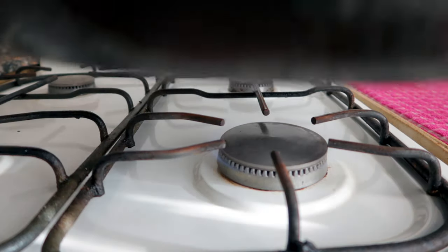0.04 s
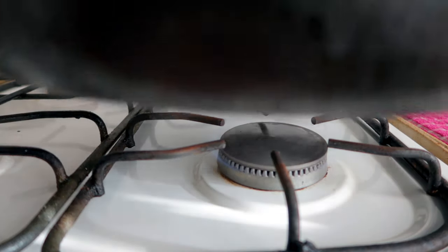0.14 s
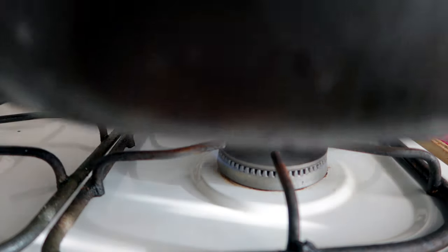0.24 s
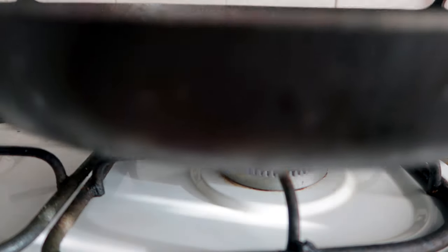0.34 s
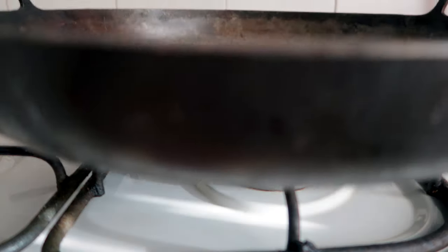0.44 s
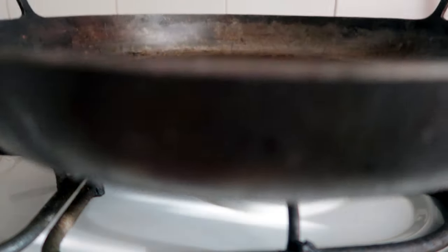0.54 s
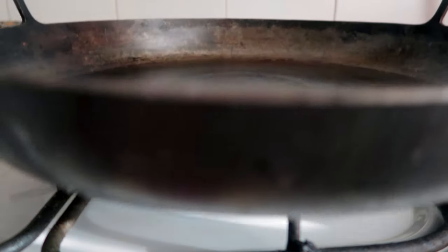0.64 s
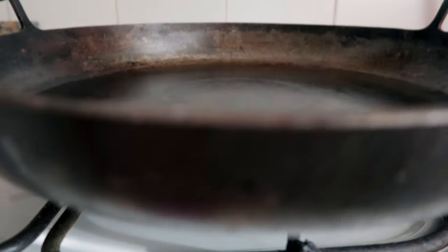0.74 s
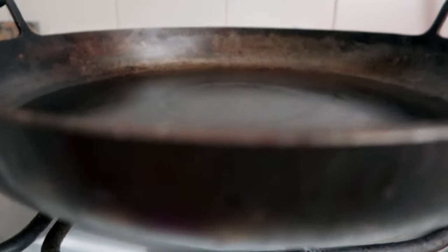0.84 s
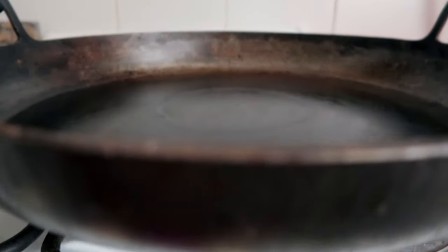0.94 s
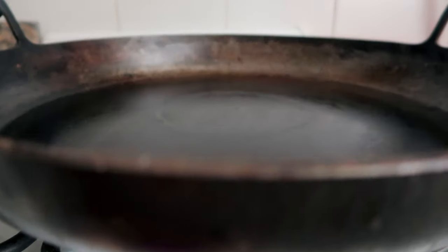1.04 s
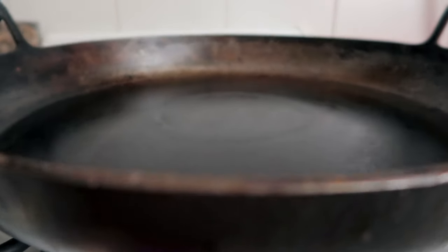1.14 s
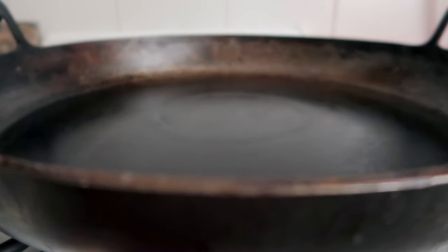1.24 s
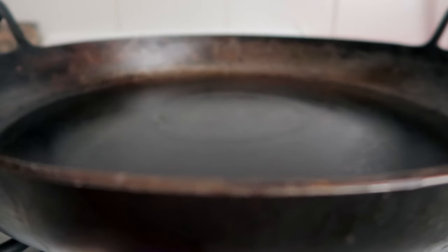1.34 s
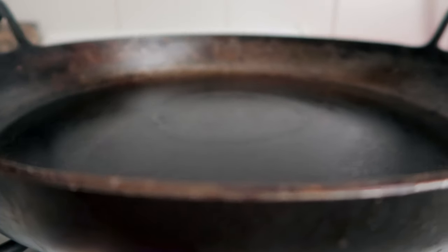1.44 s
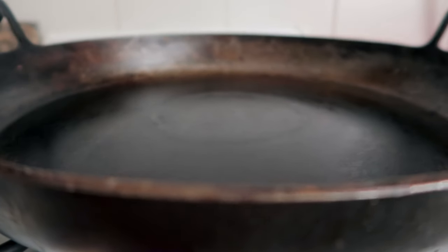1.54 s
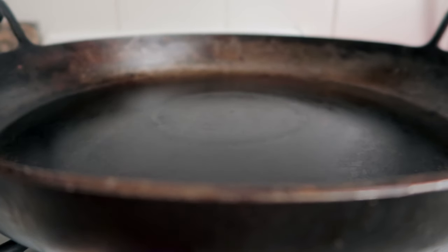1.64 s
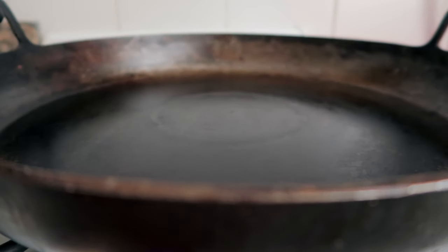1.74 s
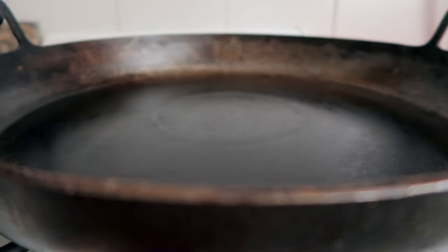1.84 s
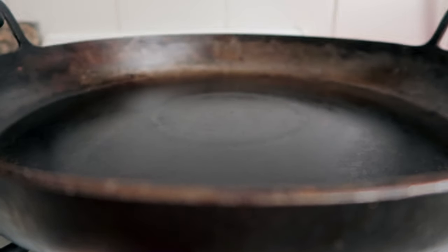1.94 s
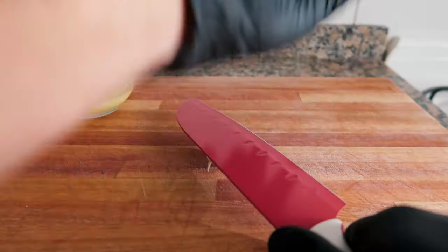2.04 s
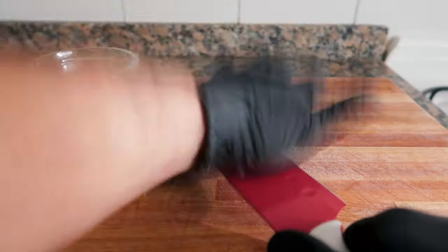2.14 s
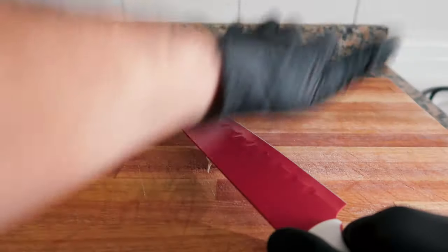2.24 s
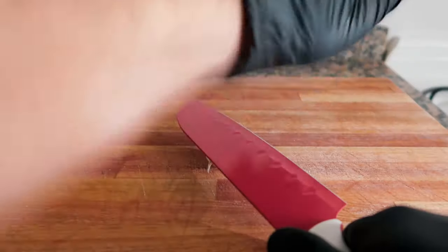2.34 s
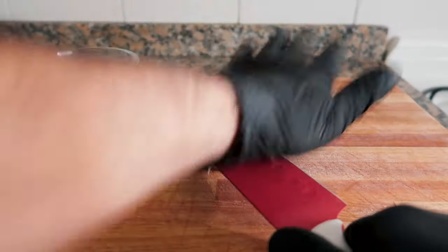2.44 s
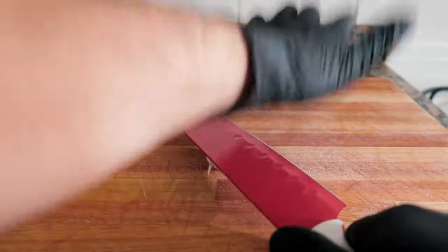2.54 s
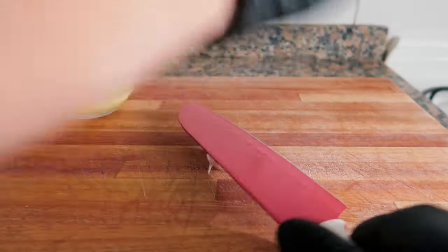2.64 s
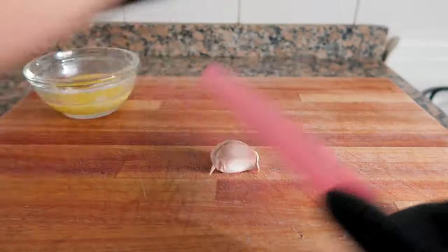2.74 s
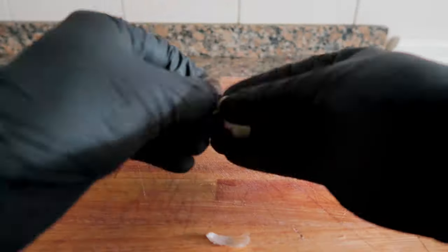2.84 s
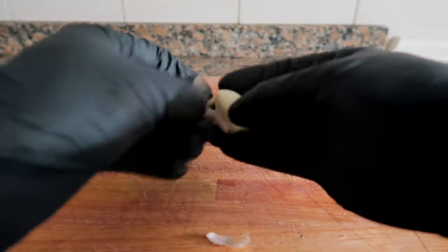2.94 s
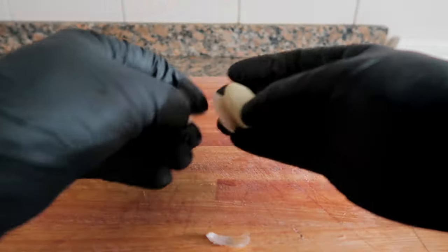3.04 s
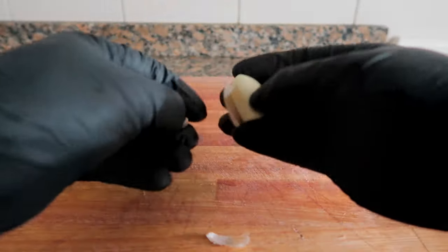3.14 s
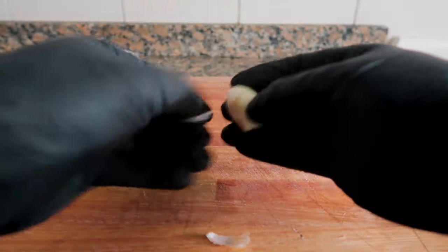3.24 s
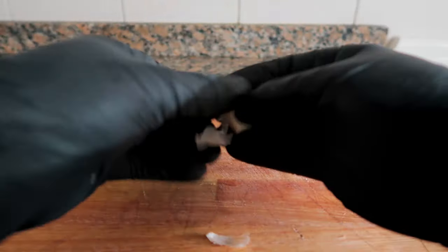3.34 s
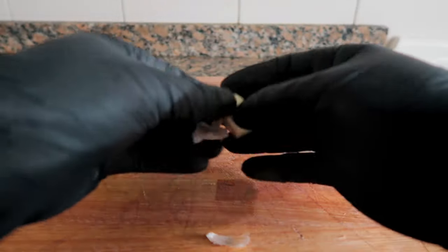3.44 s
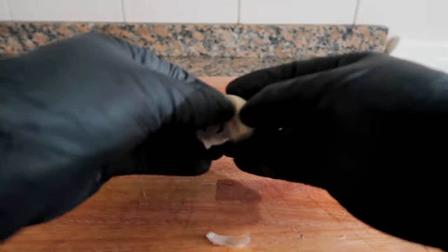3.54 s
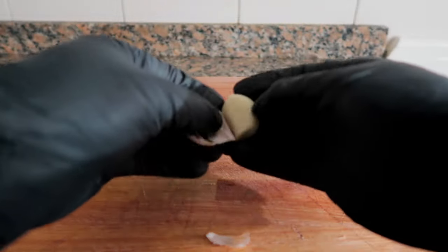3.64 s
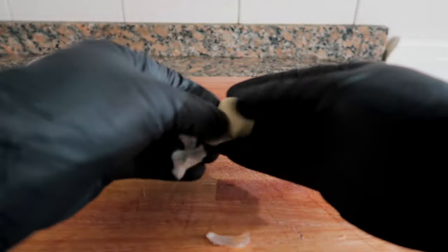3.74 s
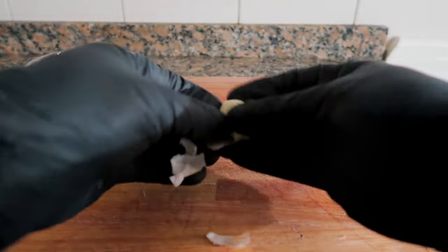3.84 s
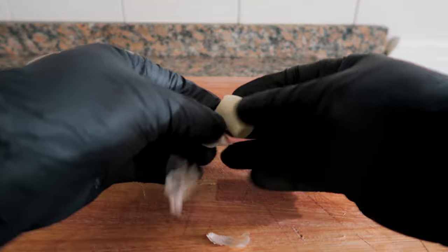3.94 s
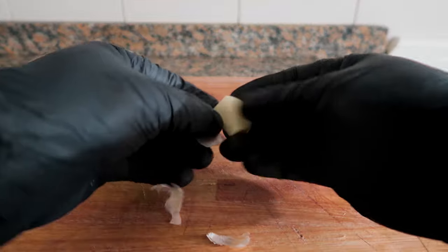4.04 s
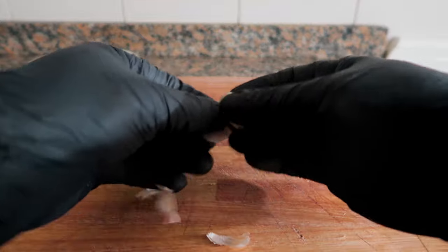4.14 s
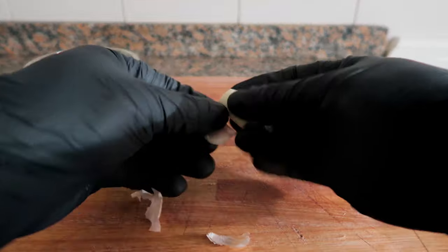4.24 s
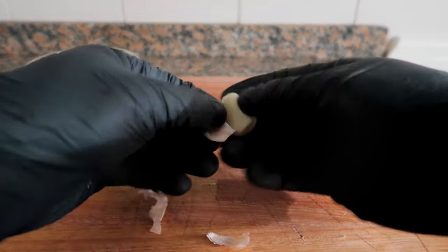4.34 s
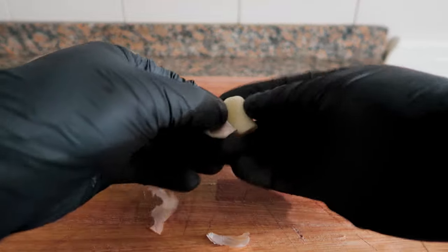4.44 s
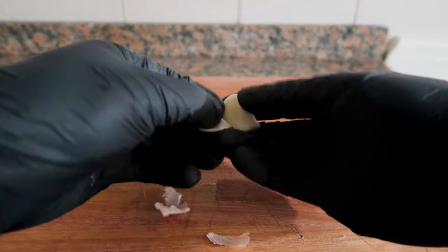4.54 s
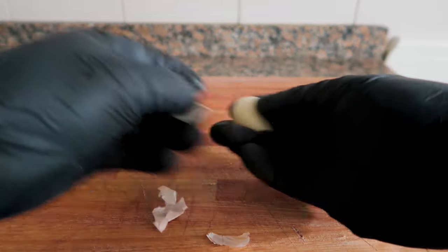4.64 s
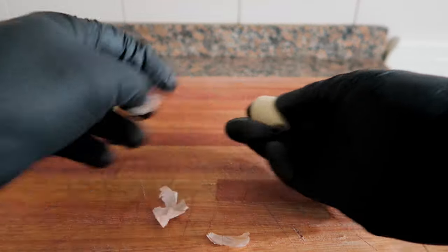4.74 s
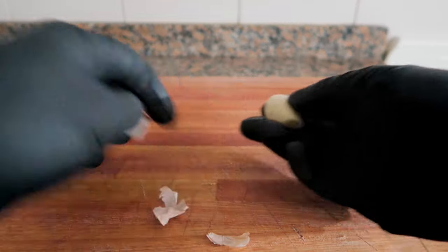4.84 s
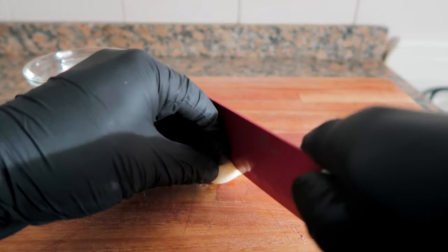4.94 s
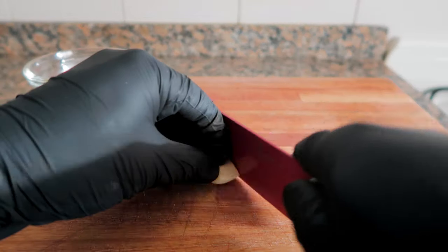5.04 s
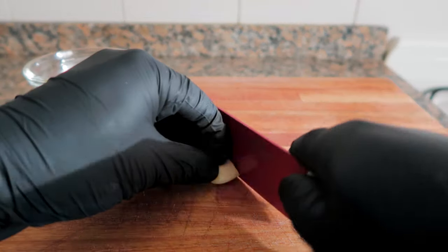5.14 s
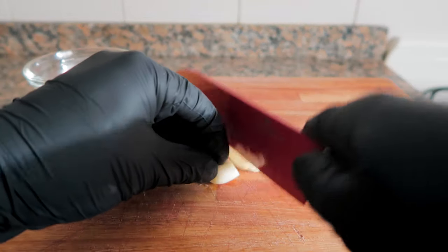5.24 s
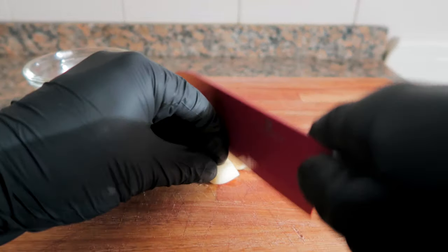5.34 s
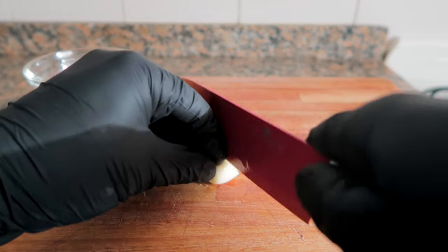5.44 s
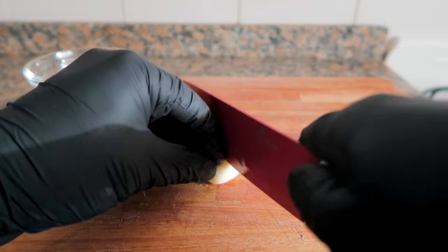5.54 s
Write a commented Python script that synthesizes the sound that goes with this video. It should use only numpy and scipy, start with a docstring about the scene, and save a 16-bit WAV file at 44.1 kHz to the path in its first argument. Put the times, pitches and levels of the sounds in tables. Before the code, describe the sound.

Gas hiss and a rattling pan landing, cut to two loud slaps on wood, papery skin crackling, slicing, one knock and a faint squeak.

```python
"""In a tiled kitchen an iron pan is set down on the grate of a hissing gas stove; then the scene changes. On a
wooden board a palm smacks the flat of a knife twice onto a garlic clove, gloved fingers peel off the papery
skin, and the knife slices through the clove, knocks on the board and squeaks. Struck bodies are sums of
decaying modes, jets and impacts are shaped noise, friction is trains of tiny fractures, echoes are noise dying
band by band; the close microphone overloads, clipping loud peaks."""
import sys
import numpy as np
from scipy import signal
from scipy.fft import rfft, irfft
from scipy.io import wavfile
from scipy.ndimage import uniform_filter1d

SR = 44100
rng = np.random.default_rng(int(sys.argv[2]) if len(sys.argv) > 2 else 0)


def master(y):
    """Save y as 16-bit WAV."""
    cut = np.clip(np.atleast_2d(y).T, -1, 1)
    pcm = np.round(cut * 32767)  # scale
    wavfile.write(sys.argv[1], SR, pcm.astype(np.int16))


N = 246519
T = np.arange(SR) / SR  # one second, the length of most single events
CLOCK = np.arange(N) / SR  # the whole scene


def amp(db):
    """Level law: decibels to amplitude gain."""
    return 10 ** (np.asarray(db) / 20)


def unit(x):
    """Normalization: scales a signal to rms 1."""
    return x / np.sqrt(np.mean(x ** 2) + 1e-20)


def read(points, hz):
    """Interpolation: reads a (hz, value) table on a log-frequency axis."""
    table_hz, value = np.transpose(points)
    return np.interp(np.log(hz + 1), np.log(table_hz), value)


def add(mix, start_s, sound):
    """Superposition: mixes a sound in at its start time."""
    part = mix[round(start_s * SR):][:len(sound)]
    part += sound[:len(part)]


def soft(hz, corner_hz):
    """Contact compliance: a softer contact excites less above its corner."""
    return 1 / np.sqrt(1 + (hz / corner_hz) ** 4)


def noise(colour, size=SR, corner_hz=np.inf):
    """Random-phase synthesis: noise of rms 1 with the given spectrum, weakened below about 36 Hz."""
    hz = np.fft.rfftfreq(size, 1 / SR)
    gain = amp(read(colour, hz)) * soft(hz, corner_hz) * (1 - soft(hz, 36))
    phase = 2 * np.pi * rng.random(len(hz))
    return unit(irfft(gain * np.exp(1j * phase), size))


def fade(t60_s):
    """Exponential decay: falls by 60 dB in t60_s."""
    return np.exp(-np.log(1000) * T / t60_s)


def rise(seconds):
    """Exponential build-up: a smooth onset with this time constant."""
    return 1 - np.exp(-T / seconds)


def held(t, start, end, ramp):
    """Envelope: attack, hold and release between two times."""
    return np.clip((t - start) / ramp + .5, 0, 1) * np.clip((end - t) / ramp + .5, 0, 1)


def wander(per_s):
    """Low-passed randomness: a slow drift of rms 1."""
    spectrum = rfft(rng.standard_normal(N))
    return unit(irfft(spectrum * soft(np.fft.rfftfreq(N, 1 / SR), per_s) ** 2, N))


def dying(x, decays):
    """Frequency-dependent damping: each band of a one-second sound dies at its own speed."""
    hz, t, bands = signal.stft(x, SR, nperseg=512)
    damping = np.exp(-np.log(1000) * t / read(decays, hz)[:, None])
    return signal.istft(bands * damping, SR, nperseg=512)[1][:SR]


def ring(modes, corner_hz, favoured_hz=0, favour_db=10):
    """Modal superposition: a struck body's modes; the contact point drives those near one frequency harder."""
    out = np.zeros(SR)
    for k, (hz, db, t60_s) in enumerate(modes):
        nearness = np.exp(-((hz - favoured_hz) / (0.091 * hz)) ** 2)
        gain = (-1) ** k * amp(db + favour_db * nearness) * soft(hz, corner_hz)
        out += gain * fade(t60_s) * np.sin(2 * np.pi * hz * T)
    return out / 2


def tick(colour, peak_hz=3000, peak_db=0, octaves=.4):
    """Minimum-phase impulse: a causal click of energy 1, its spectrum lifted around one frequency."""
    hz = abs(np.fft.fftfreq(1024, 1 / SR))
    lift_db = peak_db / (1 + (np.log2((hz + 1) / peak_hz) / octaves) ** 2)
    log_gain = np.log(amp(read(colour, hz) + lift_db))
    # the Hilbert transform of the log gain gives the minimum phase
    click = np.fft.ifft(np.exp(np.conj(signal.hilbert(log_gain)))).real[:512]
    return click / np.linalg.norm(click)


def grains(per_s, spread_db, size=N):
    """Shot noise: a random train of tiny fractures of uneven strength, rms 1."""
    strength = amp(spread_db * np.minimum(rng.exponential(1, size), 4)) * rng.choice([-1, 1], size)
    return unit(strength * (rng.random(size) < per_s / SR))


# palm on the blade: start_s, crack_db, crack_t60_s, blade_ring_db, room_db, boom_db,
# boom_brightness_hz, favoured_board_mode_hz (levels relative)
SMACKS = [(2.2752, 0.5, 0.039, -18.5, -19, -11, 139, 117), (2.5288, 14, 0.028, -27, -4.5, -5.5, 298, 245)]
# spectrum of the crack: frequency_hz, relative_level_db
CRACK = [(60, 8), (300, -12), (700, -7.5), (1400, 4), (2600, 2), (4000, -8), (8000, -14), (16000, -23.5)]
# modes of the knife blade under the hand: frequency_hz, relative_level_db, t60_s
BLADE = [(1305, 6, 0.17), (1620, -3, 0.25), (2090, -4, 0.39), (2372, -10, .33), (2430, 0, 0.32),
         (2700, -6, .17), (2936, 5.5, 0.14), (3160, 1, 0.16), (4748, -18, 0.17)]
# modes of board and worktop: frequency_hz, relative_level_db, t60_s
BOARD = [(56.8, -2.5, 0.75), (66.1, -9, 0.86), (87, 4.5, 0.24), (117.6, -1.5, 0.56), (161.3, -1.5, 0.58),
         (183, -3.5, 0.62), (209.6, 0, 0.44), (240.8, 3, 0.49), (346.5, -4.5, 0.33), (393, -3.5, 0.43),
         (545, -6, 0.42), (599, -9, 0.42), (941, 3.5, 0.31), (1028, -3.5, 0.25), (1146, -9, 0.36),
         (1250, -11, 0.29), (1308, 0.5, 0.35), (1360, -1, .27), (1480, -19, .33)]
# spectrum of the room's answer to a smack: frequency_hz, relative_level_db
SMACK_ROOM = [(40, 2), (150, 6.5), (250, 2), (330, -5), (700, -9.5), (1200, -6), (1800, -8), (2600, -2.5),
              (3600, -9), (5000, -10), (8000, -17.5), (11000, -22), (16000, -24)]
# reverberation of the kitchen: frequency_hz, t60_s
ROOM_DECAY = [(60, 0.63), (200, 0.66), (500, 0.42), (1200, 0.39), (3000, 0.39), (7000, 0.35), (15000, 0.24)]


def smacks():
    """Impact excitation: the blade cracks down on the clove and rings, the board booms, the room answers."""
    out = np.zeros(N)
    for start_s, crack_db, t60_s, blade_db, room_db, boom_db, corner_hz, favoured_hz in SMACKS:
        crack = amp(crack_db) * noise(CRACK) * fade(t60_s) * rise(0.00072)
        blade = amp(blade_db) * ring(BLADE, 8000)
        boom = amp(boom_db) * ring(BOARD, corner_hz, favoured_hz, favour_db=1.0) * rise(0.012)
        room = amp(room_db) * dying(noise(SMACK_ROOM), ROOM_DECAY) * rise(0.0017)
        add(out, start_s, crack + blade + boom + room)
    return out


# the blade flexes under the first smack: starting pitches, upward glide, level and decay
TWANG_HZ, TWANG_RISE_HZ_PER_S, TWANG_DB, TWANG_T60_S = (303, 415), 520, -29, 0.41


def twang():
    """Bending stiffness: the palm bends the blade over the still whole clove, so its low modes glide up."""
    out = np.zeros(N)
    for hz in TWANG_HZ:
        turns = np.cumsum(hz + TWANG_RISE_HZ_PER_S * T) / SR
        tone = amp(TWANG_DB) * np.sin(2 * np.pi * turns) * fade(TWANG_T60_S) * rise(0.01)
        add(out, SMACKS[0][0], tone)
    return out


CHOP_S = 5.176  # the edge hits the board
# spectrum of the knock: frequency_hz, relative_level_db
CHOP = [(40, -18.5), (200, -4.5), (500, -12.5), (900, -3), (1400, 0.5), (1900, -14.5), (3000, -24.5),
        (6000, -31), (16000, -58)]
# spectrum of the room's answer to the knock: frequency_hz, relative_level_db
CHOP_ROOM = [(40, -45), (120, -12), (240, -4), (450, -8.5), (760, -4), (950, -1.5), (1250, 0.5),
             (1550, -5.5), (1750, -14.5), (2100, -12), (2700, -25.5), (4000, -31.5), (7000, -41),
             (16000, -44.5)]
# spectrum of garlic skin and flesh giving way: frequency_hz, relative_level_db
SKIN = [(200, -37), (700, -10), (1500, 5.5), (3000, 0.5), (6000, -0.5), (9000, -1), (13000, -3),
        (16000, -3)]


def chop():
    """Impact after friction: a hiss swells as the edge speeds through the last of the clove, then a knock."""
    out = np.zeros(N)
    # a decay played backwards swells up to the moment of the knock
    hiss = (amp(-15.0) * noise(SKIN) * fade(0.083))[::-1]
    add(out, CHOP_S - 1, hiss)
    knock = amp(10) * noise(CHOP) * fade(0.053) * rise(0.00034)
    room = amp(-2.5) * dying(noise(CHOP_ROOM), ROOM_DECAY) * rise(0.015)
    # the light, hard edge drives the board itself and barely moves the heavy worktop
    worktop, wood = BOARD[:7], BOARD[7:]
    body = amp(-3.5) * ring(wood, 2500) + amp(-23.5) * ring(worktop, 200)
    add(out, CHOP_S, knock + room + body)
    return out


def slide(middle_s, half_length_s, level_db, centre_hz, crackle_db):
    """Stick-slip: dense slips and smooth friction swell and fade, with sparse crackles on top."""
    slips = unit(grains(per_s=1500, spread_db=4.0, size=SR) + 0.97 * rng.standard_normal(SR))
    crackles = amp(crackle_db) * grains(per_s=170, spread_db=2, size=SR)
    sound = signal.fftconvolve(slips + crackles, tick(SKIN, centre_hz, peak_db=7.5, octaves=0.54))[:SR]
    swell = np.exp(-((T - .5) / half_length_s) ** 2 / 2)
    return middle_s - .5, amp(level_db) * sound * swell


# spectrum of the soft rustle: frequency_hz, relative_level_db
RUSTLE = [(150, 6), (600, -7.5), (1100, -1), (1700, -1.5), (2800, -9.5), (4300, -1), (7000, -12),
          (10000, -23), (16000, -25.5)]
# spectrum of the high fizz: frequency_hz, relative_level_db
FIZZ = [(2000, -14), (5000, -25), (8000, 9), (12000, -11), (16000, -8)]


def friction(fizz_db, crackle_db, uneven_db):
    """Dry friction with uneven grip on garlic: a soft rustle, a fizz and stray ticks of many pitches."""
    flakes = [tick(SKIN, hz, peak_db=13.5, octaves=0.27) for hz in np.geomspace(1500, 12000, 8)]
    crackle = unit(sum(signal.oaconvolve(grains(per_s=25, spread_db=4.5), flake)[:N] for flake in flakes))
    rustle = amp(-3) * noise(RUSTLE, size=N)
    fizz = amp(fizz_db) * noise(FIZZ, size=N)
    return (rustle + amp(crackle_db) * crackle + fizz) * amp(uneven_db * wander(per_s=23))


# the edge sinks into the clove: start, friction level there and growth with the pressure
SLICE_S, SLICE_DB, SLICE_GROWTH_DB_PER_S = 4.702, -48, 35.5
# the edge catches and scrapes: middle_s, half_length_s, level_db, centre_hz, crackle_db (relative to the slips)
BITES = [(4.986, .06, -38.5, 8750, -10), (5.052, 0.012, -28, 4400, -0.5), (5.139, .02, -32.5, 7000, -10)]


def slicing():
    """Friction under load: the edge rubs louder as the hand presses, until it meets the board."""
    pressed_s = np.clip(CLOCK, SLICE_S, CHOP_S) - SLICE_S
    level = amp(SLICE_DB + SLICE_GROWTH_DB_PER_S * pressed_s) * held(CLOCK, SLICE_S, CHOP_S, .03)
    out = level * friction(fizz_db=-10.5, crackle_db=-8.5, uneven_db=1.7)
    for bite in BITES:
        add(out, *slide(*bite))
    return out


SQUEAK_S, SQUEAK_LENGTH_S, SQUEAK_DB = 5.29, .29, -46
SQUEAK_HZ, SQUEAK_SAG_HZ_PER_S = 3750, 950


def squeak():
    """Friction oscillation: an unsteady squeak sinks in pitch as the blade is drawn over the wood."""
    waver, grip = (unit(uniform_filter1d(rng.standard_normal(SR), size=width)) for width in (60, 500))
    hz = SQUEAK_HZ - SQUEAK_SAG_HZ_PER_S * T + 45 * waver
    swell = rise(0.011) * held(T, -1, SQUEAK_LENGTH_S, .08) * fade(1.8) * amp(3.9 * grip)
    out = np.zeros(N)
    add(out, SQUEAK_S, amp(SQUEAK_DB) * swell * np.sin(2 * np.pi * np.cumsum(hz) / SR))
    return out


# dry skin snaps: start_s, relative_level_db, flake_pitch_hz, relative_crumbling_db
SNAPS = [(2.3194, -17, 9000, -7), (2.754, -19, 3030, -4), (2.958, -20, 4770, -9.5),
         (3.0207, -18, 3740, -13), (3.044, -2.5, 4440, -12.5), (3.072, -10.5, 1700, -16),
         (3.1204, -5, 3130, -7.5), (3.1365, -2.5, 3400, -8), (3.216, -11.5, 7800, -17),
         (3.301, -14, 3040, -2.5), (3.686, -14, 7700, -6.5), (3.699, -10, 2870, -17),
         (3.722, -11.5, 3040, -12), (3.7696, -18, 3000, -10), (3.8491, -9, 5600, -11.5),
         (3.9879, -12, 7000, -10), (4.0199, -9.5, 8000, -5.5), (4.100, -8.5, 3000, -7),
         (4.218, -11, 2250, -17), (4.3285, -20, 9500, -8.5), (4.381, -22, 3200, -13.5),
         (4.671, -20.5, 4400, -12), (5.5107, -22.5, 3540, -4)]
# a break runs on in smaller snaps: mean gap, level of the first, loss with each further one
RUN_GAP_S, RUN_DB, RUN_LOSS_DB = .0085, -9, 4


def snaps():
    """Brittle fracture: a click coloured by its flake, then crumbling and a run of smaller snaps."""
    out = np.zeros(N)
    for start_s, level_db, flake_hz, crumble_db in SNAPS:
        breaks = amp(crumble_db - 10.5) * grains(per_s=2500, spread_db=4.5, size=SR) * fade(0.039)
        breaks += amp(-14.5) * rng.standard_normal(SR) * fade(.004)  # the flake flutters as it lets go
        breaks[0] = amp(-3.0)  # the first snap
        delays_s = np.cumsum(RUN_GAP_S * (.5 + rng.random(size=3)))
        for k, delay_s in enumerate(delays_s):
            add(breaks, delay_s, amp([RUN_DB - RUN_LOSS_DB * k]))
        flake = tick(SKIN, flake_hz, peak_db=10, octaves=0.22)
        add(out, start_s, amp(level_db + 8.5) * signal.fftconvolve(breaks, flake))
    return out


# the clove pops out of its husk: start_s, relative_level_db, brightness_hz
POPS = [(3.045, 0, 704), (3.1375, -4, 2600), (3.1425, 3, 2000)]
# modes of the hollow husk: frequency_hz, relative_level_db, t60_s
HUSK = [(780, -8, .015), (1180, -10.5, .012), (1343, -6, 0.028), (1500, 1.5, 0.015), (1850, -8, .008)]


def pops():
    """Cavity resonance: the hollow husk rings briefly as it lets go of the clove."""
    out = np.zeros(N)
    for start_s, level_db, corner_hz in POPS:
        add(out, start_s, amp(level_db) * ring(HUSK, corner_hz) * rise(0.00064))
    return out


# fingers pull skin off: middle_s, half_length_s, level_db, centre_hz, crackle_db (relative to the slips)
PULLS = [(3.061, .036, -31, 4500, -5), (3.132, .013, -27.5, 4500, 1), (3.352, 0.019, -39, 7000, -8),
         (3.485, .007, -33.5, 11200, -12), (3.569, 0.043, -39, 2620, -3), (3.716, .023, -32, 3880, -5),
         (3.844, 0.013, -32.5, 6000, -14), (3.999, 0.0081, -28.5, 2300, -1), (4.034, .007, -24.5, 9000, -4),
         (4.093, 0.016, -35, 6000, -12), (4.295, 0.028, -40, 1990, 0.5), (4.648, 0.059, -46.5, 4200, -2.5),
         (4.753, .019, -34, 4960, -18)]


def pulls():
    """Stick-slip peeling: the fingers draw the skin off, strip by strip."""
    out = np.zeros(N)
    for pull in PULLS:
        add(out, *slide(*pull))
    return out


# the gloves rub all through the peeling: limits, friction level at the start and its easing off
RUB_FROM_S, RUB_TO_S, RUB_DB, RUB_EASE_DB_PER_S = 2.86, 4.49, -45, 2.5


def rubbing():
    """Friction under a lessening load: gloves rub more lightly as the skin comes away."""
    level = amp(RUB_DB - RUB_EASE_DB_PER_S * (CLOCK - RUB_FROM_S)) * held(CLOCK, RUB_FROM_S, RUB_TO_S, .12)
    return level * friction(fizz_db=-10, crackle_db=-2.5, uneven_db=2)


# pan meets grate: start_s, force_db, clank_t60_s, rattle_db and ring_db (relative to the force),
# brightness_hz, favoured_by_contact_point_hz, grate_bar_pitch_hz
PAN_BLOWS = [(1.177, -8.5, 0.041, -15, -15.5, 4330, 3900, 352),
             (1.184, -.5, 0.1, -9.5, -16, 2210, 2040, 466), (1.213, -11, .05, -31, -26, 1200, 503, 282),
             (1.259, -3, 0.074, -11.5, -11, 7500, 4350, 545.4),
             (1.267, -1.3, 0.066, -13, -17, 4500, 797, 250.4),
             (1.610, -6, 0.032, -13, -12.5, 2530, 1560, 296),
             (1.662, -16.5, 0.065, -11.5, -20, 1390, 1600, 250)]
# modes of the pan on its grate: frequency_hz, relative_level_db, t60_s
PAN = [(142.5, -4, 1.4), (182, -11, 1.3), (236.8, 4.5, 0.84), (252, 1, 0.35), (281, 0.5, 0.63),
       (305, 3, 0.61), (456, -5, 0.61), (455, 1.5, 0.45), (524, -5, 0.58), (718, -14, 0.37), (819, 4, 0.44),
       (846, -9.5, 1.66), (940, -10, 0.29), (1180, -5, 0.36), (1277, -1.5, 0.67), (1330, -6, 0.21),
       (1588, -7, 0.5), (1852, -6, 0.57), (2264, -8, 0.65), (2945, -23, 0.37), (3122, -13.5, 0.47),
       (3410, -13, 0.68), (3420, -15, 0.57), (4000, -5.5, 0.35), (4277, -5, 0.41), (4328, -4.5, 0.29),
       (5001, -10, 0.37), (5300, -9, 0.59), (7060, -13, .25), (8870, -23, .3)]
# spectrum of the clank of iron: frequency_hz, relative_level_db
CLANK = [(50, -33), (120, -18), (250, -1.5), (500, 3), (900, -0.5), (1400, -3), (2200, -10.5), (4200, -5.5),
         (6000, -24), (10000, -38), (16000, -32)]
# spectrum of the rattling sheet-metal stove top: frequency_hz, relative_level_db
STOVE_TOP = [(35, -37), (80, -8.5), (140, -1.5), (260, 0), (400, -1), (800, -12), (1200, -7), (1500, -11.5),
             (2100, -15), (2700, -16.5), (3400, -22), (4300, -23), (6500, -35.5), (16000, -62)]
# decay of that rattle: frequency_hz, t60_s
STOVE_TOP_DECAY = [(60, 1.4), (200, 1.02), (500, 0.72), (1500, 0.43), (4000, 0.36), (12000, 0.32)]
# the clank follows the force; the grate's thud grows faster than the force (dB per dB)
CLANK_DB, THUD_DB, THUD_GROWTH, THUD_T60_S = -13, 0, 2.6, 0.16


def pan():
    """Repeated impact: the pan lands, rocks and settles; iron clanks and rings, grate thuds, stove rattles."""
    out = np.zeros(N)
    for start_s, force_db, t60_s, rattle_db, ring_db, corner_hz, favoured_hz, bar_hz in PAN_BLOWS:
        # dividing by the root of the decay time evens out the energy of short and long clanks
        clank = amp(CLANK_DB) * noise(CLANK, corner_hz=corner_hz) * fade(t60_s) / np.sqrt(t60_s)
        clank *= rise(0.00077)
        rattle = dying(noise(STOVE_TOP, corner_hz=2 * corner_hz), STOVE_TOP_DECAY)
        rattle *= amp(rattle_db) * rise(0.0016)
        iron = amp(ring_db) * ring(PAN, corner_hz, favoured_hz, favour_db=12)
        bar = np.sin(2 * np.pi * bar_hz * T) * fade(THUD_T60_S) * rise(0.0026)
        thud = amp(THUD_DB + THUD_GROWTH * force_db) * bar
        add(out, start_s, amp(force_db) * (clank + rattle + iron) + thud)
    return out


def handling():
    """Soft contact: a low bump and a tiny scrape while the pan is carried in."""
    out = np.zeros(N)
    bump = amp(-33.0) * np.sin(2 * np.pi * 112 * T) * fade(0.28) * rise(.015)
    add(out, .215, bump)
    scrape = amp(-40) * noise(FIZZ) * fade(.08) * rise(.003)
    add(out, .468, scrape)
    return out


# smooth spectrum of the gas hiss: frequency_hz, relative_level_db
GAS = [(35, -40), (60, -7), (133, 1), (417, -10), (651, -5.5), (1110, -19), (1660, -6.5), (2350, -11),
       (2580, -26), (3040, -29), (3760, -20.5), (14900, -43), (16000, -30)]
# cavity resonances of the burner: frequency_hz, width_hz, relative_level_db
BURNER = [(657, 51, -11), (1653, 54, -1), (2595, 93, 0.5), (3940, 220, -8.5), (5010, 61, -17),
          (6810, 210, -13), (7920, 260, -14.5), (9730, 280, -14.5), (10700, 240, -19), (12000, 200, -15),
          (13500, 300, -20), (15200, 350, -15)]


def gas():
    """Jet noise: turbulent gas sounds the burner's cavity resonances, each wavering on its own."""
    hz, whistle = np.fft.rfftfreq(N, 1 / SR), np.zeros(N)
    jet = rfft(rng.standard_normal(N))
    knots_s = np.linspace(0, N / SR, num=50)
    for centre_hz, width_hz, level_db in BURNER:
        waver_db = 1.6 * np.interp(CLOCK, knots_s, rng.standard_normal(len(knots_s)))
        resonance = unit(irfft(jet / (1 + ((hz - centre_hz) / width_hz) ** 2), N))
        whistle += amp(level_db + waver_db) * resonance
    return amp(-45) * unit(whistle) + amp(-44.5) * noise(GAS, size=N)


# colour of the echo: frequency_hz, relative_level_db
ECHO = [(100, 3.0), (3000, 1), (8000, 0.0), (16000, 1)]


def kitchen(x):
    """Diffuse reverberation: convolution with the dying noise of the tiled walls."""
    tail = dying(noise(ECHO), ROOM_DECAY) * rise(0.0016)
    return signal.oaconvolve(x, tail / np.linalg.norm(tail))[:N]


# a faint low hum comes and goes: start_s, length_s, pitch_hz, level_db
HUMS = [(3.13, 0.263, 165.7, -43), (4.71, 0.34, 171, -43), (4.979, 0.35, 247, -37)]


def hum():
    """Pure tones under a smooth envelope: faint low hums swell and fade while the hands work."""
    out = np.zeros(N)
    for start_s, length_s, hz, level_db in HUMS:
        t = T[T < length_s]
        add(out, start_s, amp(level_db) * signal.windows.tukey(len(t), .5) * np.sin(2 * np.pi * hz * t))
    return out


# spectrum of the quiet kitchen: frequency_hz, relative_level_db
AIR = [(30, -24), (60, -19.5), (130, 0), (240, -3.5), (400, -9.5), (1000, -18.5), (3000, -21),
       (8000, -27.5), (16000, -33.5)]


def air():
    """Stationary background noise: the quiet kitchen."""
    return amp(-47) * noise(AIR, size=N)


# the stove fades out from this time on
STOVE_END_S, STOVE_FADE_DB_PER_S = 2.074, 168


def scene():
    """Superposition of sources: first the stove, which is quickly faded out as the scene changes; then the work
    on the board."""
    stove_fade = amp(-STOVE_FADE_DB_PER_S * np.maximum(CLOCK - STOVE_END_S, 0))
    stove = (gas() + handling() + pan()) * stove_fade
    garlic = snaps() + pops() + pulls() + rubbing() + slicing()
    knife = smacks() + twang() + chop() + squeak()
    echo = amp(-10.5) * kitchen(garlic)
    return (stove + knife + garlic + echo + hum() + air())[None]


def record(dry):
    """Overload and band limit: the loud blows clip flat, then a low-pass removes the highest treble."""
    clipped = np.clip(dry, -1, 1)
    lowpass = signal.firwin(255, 16200, window=("kaiser", 8), fs=SR)  # cutoff in Hz
    return signal.oaconvolve(clipped, lowpass[None], "same")


dry = scene()
out = record(dry)
master(out)
```